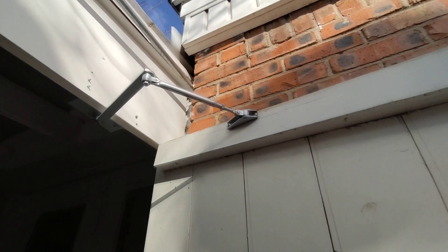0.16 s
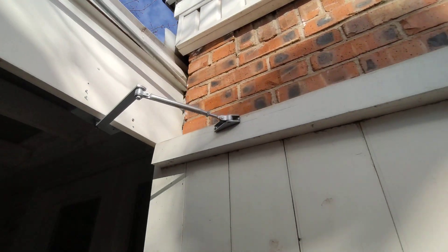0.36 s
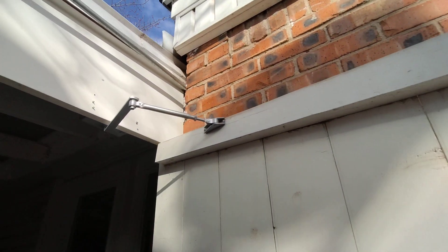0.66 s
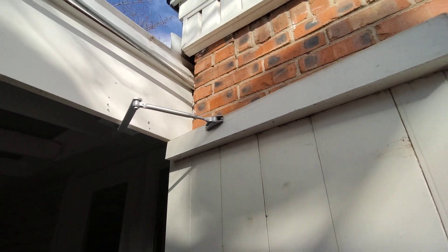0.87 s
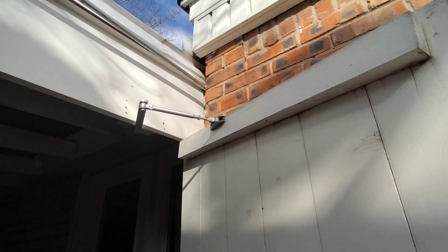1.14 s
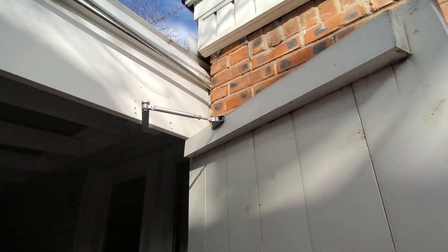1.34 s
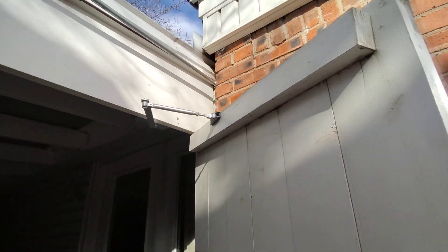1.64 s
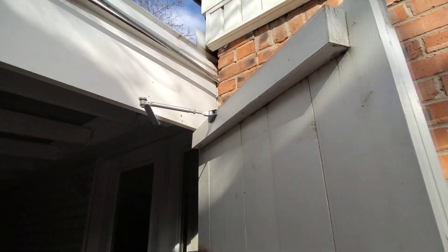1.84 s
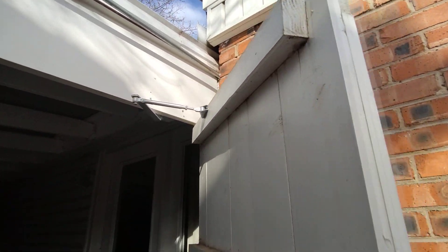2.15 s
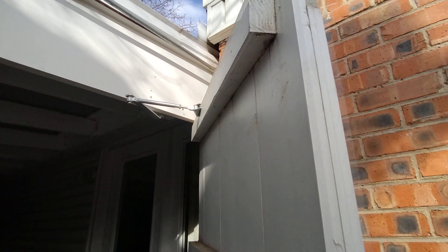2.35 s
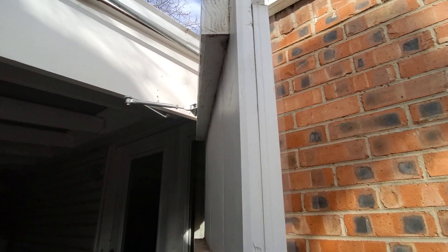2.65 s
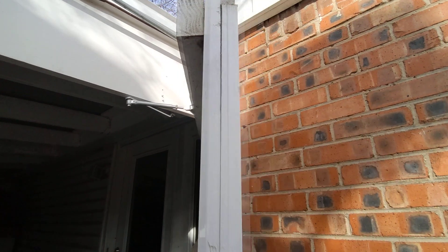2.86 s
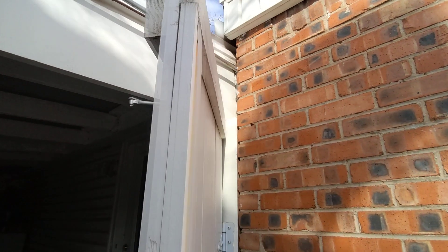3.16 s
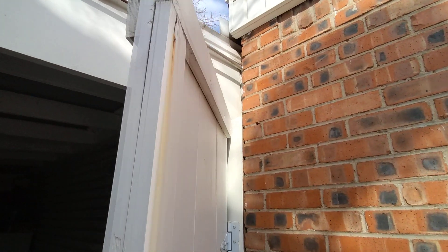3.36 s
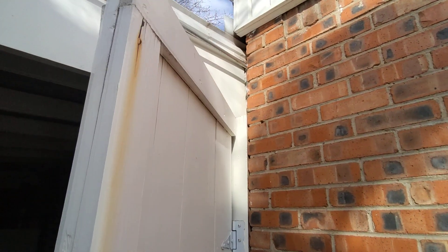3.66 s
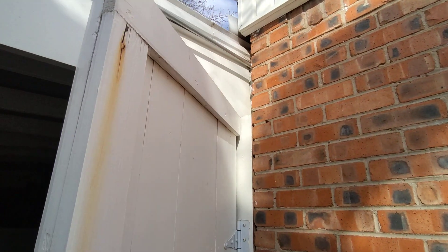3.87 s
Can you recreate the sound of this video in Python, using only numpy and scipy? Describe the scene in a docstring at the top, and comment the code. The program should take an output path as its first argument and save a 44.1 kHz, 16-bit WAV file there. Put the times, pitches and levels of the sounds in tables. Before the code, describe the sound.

A small piston air compressor drones loudly from an open garage, a rough steady low buzz with metallic valve chatter and airy casing noise. A light metal tick sounds near 0.9 s. At 1.9 s it cuts out; a bright air hiss bursts and fades by about 2.5 s as the garage rings briefly. Then wind puffs thump on the handheld microphone, leaves rustle over a faint distant wash, and three scuffs come at 2.85-3.15 s.

```python
"""A small piston air compressor drones inside an open garage, heard from the doorway on a drifting hand-held microphone.
It cuts out as its unloader valve hisses, and the garage rings out; then wind puffs on the microphone, leaves rustle
and three scuffs sound. The drone is shaft-speed sines with reflections, the reed valve and a metal tick are
struck resonances, and hiss, casing, leaves and a distant wash are coloured noise; puffs are short pressure lumps."""
import sys
import numpy as np
from scipy import signal
from scipy.fft import rfft, irfft
from scipy.io import wavfile

SR = 44100
rng = np.random.default_rng(int(sys.argv[2]) if len(sys.argv) > 2 else 0)


def inscribe(sig):
    """Save sig as 16-bit PCM at rate SR to the path in sys.argv[1].

    A 1-D sig is mono; a 2-D sig holds one channel per row.
    Samples are clipped to [-1, 1] before scaling.
    """
    pcm = np.round(np.clip(np.atleast_2d(sig).T, -1, 1) * 32767)
    wavfile.write(sys.argv[1], SR, pcm.astype(np.int16))


N = 176400

TURNS_PER_S = 54.1   # running speed of the shaft
STOP_S, COAST_T60_S = 1.897, 0.7   # power cut, and the fade of the coasting machine


def from_db(db):
    """Decibels to gain."""
    return 10 ** (np.asarray(db, float) / 20)


def rms_one(x):
    """Scale to rms 1."""
    return x / np.sqrt(np.mean(x ** 2) + 1e-20)


def clock():
    """Seconds at every sample."""
    return np.arange(N) / SR


def in_time(rows):
    """Columns of a table as straight lines in time."""
    s, *columns = np.transpose(rows)
    return np.array([np.interp(clock(), s, c) for c in columns])


def at_hz(points, hz):
    """Read a spectrum on a log-frequency axis."""
    point_hz, value = np.array(points).T
    return np.interp(np.log(hz), np.log(point_hz), value)


def port_gains(left_minus_right_db):
    """Split a level difference evenly between the left and right ports."""
    return from_db(np.array([[.5], [-.5]]) * left_minus_right_db)


def drift(rate):
    """Slow random wander of rms 1: noise through two equal low-pass poles at rate Hz."""
    step = 40   # samples between the computed points
    r = np.exp(-2 * np.pi * rate * step / SR)
    white = rng.standard_normal(N // step + 2002)
    slow = signal.lfilter([1], [1, -2 * r, r * r], white)[2000:]
    return np.interp(np.arange(N) / step, np.arange(len(slow)), rms_one(slow))


def dying(start, t60):
    """1 until start, then an exponential fall of 60 dB per t60."""
    return from_db(-60 * np.maximum(clock() - start, 0) / t60)


def ring(clicks, hz, t60):
    """A two-pole resonator: a unit click sets a sine of height 1 ringing."""
    r, w = np.exp(-np.log(1000) / (t60 * SR)), 2 * np.pi * hz / SR
    return signal.lfilter([0, np.sin(w)], [1, -2 * r * np.cos(w), r * r], clicks + 1e-18)


def noise(spectrum, patchy_db, alike_share=1):
    """Stereo noise of a given colour, part shared by the two ports, flickering by octave."""
    # likeness of the two ports before the lag: (f/Hz, likeness 0-1)
    port_likeness = [(60, 0.61), (130, 0.98), (290, 0.98), (640, 0.068), (1410, 0.01), (3100, 0.01),
                     (6820, 0.06), (15000, 0.055)]
    # level difference of the two ports, applied above 500 Hz only: (f/Hz, L-R level/dB)
    port_balance = [(60, -5.0), (130, -5.0), (290, 10), (640, 0.5), (1410, 2.5), (3100, -4.5), (6820, 1),
                    (15000, 1.5)]
    right_lag_s, flicker_hz = .0005, 17.6
    hz = np.maximum(np.arange(N // 2 + 1) * SR / N, 1)
    alike = np.clip(alike_share * at_hz(port_likeness, hz), -1, 1)
    colour = from_db(at_hz(spectrum, hz)) * (hz > spectrum[0][0])
    mid, side = rfft(rng.standard_normal((2, N))) * colour
    both = np.sqrt(1 + alike) * mid + np.sqrt(1 - alike) * side * [[1], [-1]]
    both = both * port_gains(at_hz(port_balance, hz) * (hz > 500))
    both[1] *= np.exp(-2j * np.pi * hz * right_lag_s)
    octave = np.clip(np.log2(hz / 60), 0, 8)
    out = np.zeros((2, N))
    for k in range(9):
        band = irfft(both * np.clip(1 - abs(octave - k), 0, 1), N)   # overlapping triangles
        out += band * from_db(patchy_db * drift(flicker_hz))
    return rms_one(out)


def turns():
    """Turns of the shaft so far; it slows once the power is cut."""
    slowing_hz_per_s = 60
    speed = TURNS_PER_S - slowing_hz_per_s * np.maximum(clock() - STOP_S, 0)
    return np.cumsum(np.maximum(speed, 0)) / SR


def drone(shaft):
    """Multiples of the shaft speed: a direct wave and its reflection, which slides in and out of step."""
    # (multiple, direct level/dB left, right, dip depth 0-1 left, right, dips per s left, right,
    #  t/s of a dip left, right, left leads/rad); the sign of the dip rate is the way the reflection slides
    harmonics = [(1, -44, -44, 0.19, 0.17, -0.19, -0.29, 0.9, 0.83, -0.2),
                 (2, -25, -24, 0.35, 0.43, 0.17, 0.13, 1.25, 1.25, 0.3),
                 (3, -24, -23, 0.11, 0.18, 0.25, 0.27, 2.38, 1.83, 0.43),
                 (4, -41, -42, 0.34, 0.61, 0.36, 0.3, 3.3, 0.76, -0.56),
                 (5, -41, -41, 0.11, 0.63, 0.29, 0.17, 0.69, 1.45, 0.35),
                 (6, -27, -26, 0.51, 0.36, -0.07, -0.06, 2.19, 1.63, 0.9),
                 (7, -38, -32, 0.74, 0.29, 0.28, -0.37, 3.04, 1.38, 0.07),
                 (8, -39, -53, 0.72, 0.71, -0.28, 0.57, 1.76, 0.96, 1.63),
                 (9, -30, -32, 0.22, 0.41, -0.61, -0.61, -0.15, 0.66, -1.49),
                 (10, -29, -35, 0.27, 1.0, 0.42, 0.44, 0.67, 0.38, 1.14),
                 (11, -28, -30, 0.71, 1.0, 0.41, 0.18, 0.84, 1.39, -0.27),
                 (12, -30, -38, 0.91, 1.0, 0.13, -0.34, 0.27, 0.64, 0.59),
                 (13, -35, -39, 0.91, 0.52, -0.25, -0.35, -0.18, 0.79, 0.72),
                 (14, -25, -30, 0.59, 0.74, 0.81, 0.7, 0.7, 1.34, 1.03),
                 (15, -31, -28, 0.53, 0.53, 0.61, 0.59, -1.32, 1.57, 0.81),
                 (16, -36, -30, 0.4, 0.8, -0.82, -0.12, 0.65, 1.56, 0.43),
                 (17, -29, -40, 0.66, 0.65, -0.13, -0.93, 0.65, 1.06, -0.45),
                 (18, -26, -26, 0.73, 0.28, 0.45, 0.94, 0.39, -0.05, 3.2),
                 (19, -32, -35, 0.39, 1.0, 0.79, -0.47, 1.62, 0.17, -2.98),
                 (20, -32, -33, 0.32, 1.0, 0.94, -0.12, 1.98, -0.17, -3.2),
                 (21, -43, -41, 1.0, 0.88, -0.52, -0.61, 2.71, 1.51, -0.78),
                 (22, -40, -38, 1.0, 0.84, 0.92, 0.43, 1.39, 2.79, 0.45),
                 (23, -43, -41, 0.78, 1.0, -1.17, 0.27, 1.9, 0.02, -2.58),
                 (24, -37, -37, 0.58, 0.43, -0.41, -0.52, 1.48, 2.78, -2.92),
                 (25, -38, -45, 0.39, 0.59, 0.49, -1.25, 0.72, 1.06, -1.68),
                 (26, -38, -39, 0.65, 0.38, -0.44, -1.18, 0.38, 0.97, 0.36),
                 (27, -43, -45, 1.0, 0.57, 0.39, -0.55, -1.2, 2.39, 1.07),
                 (28, -41, -44, 0.31, 0.43, 1.25, 0.75, 1.62, 1.55, -1.33),
                 (29, -41, -37, 0.83, 0.45, 1.41, -0.22, -1.1, 1.32, 2.98),
                 (30, -47, -48, 0.59, 0.47, 0.6, -0.95, 2.37, -0.71, -1.12),
                 (31, -38, -43, 0.82, 1.0, -0.57, 0.16, 2.1, 2.31, 0.01),
                 (32, -37, -50, 0.82, 1.0, 0.68, -0.66, 2.79, -0.18, 0.85),
                 (33, -40, -41, 0.57, 0.33, -0.46, 1.43, 1.45, 0.02, -1.91),
                 (34, -36, -33, 0.74, 0.76, 0.33, -0.21, 0.81, 1.35, -0.82),
                 (35, -40, -41, 0.73, 0.51, -0.67, 0.56, -0.96, 1.16, -2.0),
                 (36, -41, -49, 0.4, 0.9, -0.95, -0.73, 1.49, -0.74, -1.49),
                 (37, -37, -49, 0.89, 0.76, 0.1, 0.88, -0.09, 2.83, -3.2),
                 (38, -44, -46, 0.49, 0.34, -1.38, -0.81, 2.78, 1.56, 1.67),
                 (39, -48, -49, 0.53, 0.75, 1.69, 1.1, 0.06, 2.15, -1.14),
                 (40, -50, -45, 1.0, 0.49, 0.73, 0.46, -0.36, 0.48, -0.72)]
    # one multiple stands out at first: (t/s, gain level/dB)
    whine_gain = [(0, 5), (.17, 4), (.42, -3), (.8, 0), (4, 0)]
    whine_multiple = 34
    stroke_spread = .35   # how far higher multiples trail within a turn, rad per multiple squared
    waver_db, waver_hz = .3, 5.6
    thump_top, thump_ends_s, thump_loss_db, thump_fall_s = 5, 1.912, -9, .012
    held_share, held_for_s, held_t60_s = .72, .03, .3   # part of the drone stored in the garage

    used = slice(0, int((STOP_S + .4) * SR))
    out, s = np.zeros((2, N)), clock()[used]
    # the lowest multiples drop when the unloader opens
    unloaded = thump_loss_db * np.clip((s - thump_ends_s) / thump_fall_s, 0, 1)
    coasting = (1 - held_share) * dying(STOP_S, COAST_T60_S)[used]
    held = held_share * dying(STOP_S + held_for_s, held_t60_s)[used]
    whine = in_time(whine_gain)[0, used]
    lost = TURNS_PER_S * s - shaft[used]   # turns lost to slowing
    for k, *pairs, lead in harmonics:
        db, depth, dips, dip_s = np.reshape(pairs, (4, 2, 1))
        phase = 2 * np.pi * k * TURNS_PER_S * s - stroke_spread * k * k + np.array([[lead], [0]])
        reflection = depth * np.exp(2j * np.pi * dips * (s - dip_s))
        wave = np.exp(1j * phase) * (1 - reflection)
        # the stored part dies away at full pitch, the coasting part falls with the shaft
        wave = np.real(wave * (held + coasting * np.exp(-2j * np.pi * k * lost)))
        level = db + waver_db * drift(waver_hz)[used]
        level = level + unloaded * (k <= thump_top) + whine * (k == whine_multiple)
        out[:, used] += np.sqrt(2) * from_db(level) * wave
    return out


def valve(shaft):
    """The reed slaps twice a turn and strikes resonances; each ring swells and fades on its own."""
    # rings of the reed: (f/Hz, level/dB per slap before the waver, t60/s)
    reed_rings = [(2520, -48, .03), (4545, -51, .16), (6170, -54, .1), (6277, -51, .14), (6332, -46, .2),
                  (6385, -50, .14), (6600, -54, .1), (7900, -56, .05)]
    return_slap = .6   # strength of the second slap of a turn
    waver_db, waver_hz = 2, 1.4
    thin_whine_hz, swell_s, swell_width_s, swell_db = 4545, 1.68, .1, 6   # one ring swells late
    slap_steps = np.floor(shaft) + return_slap * np.floor(shaft + .5)
    uneven = from_db(rng.normal(0, 1, N))
    slaps = np.diff(slap_steps, prepend=0) * uneven * dying(STOP_S, COAST_T60_S)
    swell = swell_db * np.exp(-((clock() - swell_s) / swell_width_s) ** 2)
    rung = np.zeros(N)
    for hz, db, t60 in reed_rings:
        level = db + waver_db * drift(waver_hz) + swell * (hz == thin_whine_hz)
        rung += from_db(level) * ring(slaps, hz, t60)
    return np.array([rung, np.roll(rung, 20)])   # right port 20 samples later


def casing(shaft):
    """Air and casing noise that pulses with each stroke, twice a turn."""
    # colour of the airflow and casing noise: (f/Hz, relative level/dB per Hz)
    casing_colour = [(25, -50), (60, -34), (130, -17), (225, -23), (330, -10), (480, -4.5), (700, -7.5),
                     (950, -6.5), (1300, -10), (1870, -6), (2800, -12), (4000, -14.5), (5100, -16.5),
                     (6400, -14), (8500, -18), (10500, -27), (13300, -37.5), (15500, -46)]
    level_db, pulsing, t60_s = -24.5, 0.027, 0.85
    pulse = 1 + pulsing * np.cos(2 * 2 * np.pi * shaft) * dying(STOP_S, COAST_T60_S)
    return from_db(level_db) * pulse * dying(STOP_S, t60_s) * noise(casing_colour, patchy_db=.5)


def ring_out():
    """The smeared drone dies away in the garage as noise; a few resonant pitches stand out of it."""
    # colour of the garage ringing out: (f/Hz, relative level/dB per Hz)
    garage_colour = [(35, -54), (60, -16), (190, -1), (237, -19), (339, 2), (414, -7), (629, -1), (815, -5),
                     (1100, -5.5), (1370, -10), (1600, -8), (2860, -14.5), (7000, -16), (9100, -46),
                     (15400, -120)]
    # pitches that linger: (f/Hz, level/dB against the smear, t60/s)
    lingering = [(148, -18, 0.14), (288.4, -15, 0.54), (496, -22, 0.22), (636, -12, 0.34), (769, -10, .35),
                 (1107, -9.5, .25)]
    level_db, rise_s, t60_s = -16.5, 0.056, 0.64
    rise = np.clip((clock() - STOP_S) / rise_s, 0, 1)
    smear = noise(garage_colour, patchy_db=-1.0)
    pitches = sum(from_db(db) * rms_one(ring(smear, hz, t60)) for hz, db, t60 in lingering)
    return from_db(level_db) * rise * dying(STOP_S, t60_s) * (smear + pitches)


def unloader():
    """The unloader valve vents a jet of air: bright noise that bursts out and fades."""
    # (t/s, level/dB)
    venting = [(1.86, -42), (1.89, -23.5), (1.97, -22.5), (2.07, -22), (2.14, -25.5), (2.2, -30),
               (2.35, -35), (2.6, -44), (2.75, -58)]
    # colour of the jet: (f/Hz, relative level/dB per Hz)
    jet_colour = [(1470, -54), (2500, -15), (4470, -8.5), (6110, -3), (6740, -3), (7920, 1), (10600, -3),
                  (11300, -8), (15500, 0.5)]
    return from_db(in_time(venting)) * noise(jet_colour, patchy_db=1.0)


def tick():
    """One light tap on metal: a dry snap of noise and a short ring of struck modes."""
    # modes of the metal: (f/Hz, level/dB against the tap, t60/s)
    metal_modes = [(3100, -1, .03), (3900, -4, .025), (4500, -1, .03), (5100, -5, .02), (5720, -1, .075),
                   (7700, -9, .02), (11300, -13, .015)]
    tick_s, tick_db = .919, -25
    snap_db, snap_t60_s = -6, .03   # snap level is against the tap
    click = np.zeros(N)
    click[int(tick_s * SR)] = from_db(tick_db)
    band = signal.butter(2, [2500, 6500], "band", fs=SR, output="sos")
    bright = rms_one(signal.sosfilt(band, rng.standard_normal(N)))
    snap = from_db(tick_db + snap_db) * (clock() > tick_s) * dying(tick_s, snap_t60_s) * bright
    return snap + sum(from_db(db) * ring(click, hz, t60) for hz, db, t60 in metal_modes)


def scuffs():
    """Short gritty slides on the ground that sag as they go: noise, a rough gliding squeak and a bright spray."""
    # (t/s, grit level/dB before the sag, length/s, squeak f/Hz, its rise/Hz per s,
    #  squeak level/dB against the grit, spray level/dB against the grit, L-R level/dB)
    slides = [(2.848, -33.5, 0.09, 2300, -900, -5.5, -4.5, -0.5),
              (3.028, -40, 0.084, 1690, 2600, 1.5, -12, 2), (3.124, -47, 0.07, 790, 100, -3, -12, 5)]
    # colour of the grit: (f/Hz, relative level/dB per Hz)
    grit_colour = [(180, -37), (300, -0.5), (598, -2), (672, -8), (1060, 1.5), (1360, -3.5), (2270, -0.5),
                   (2520, -9), (6530, -10), (7680, -11), (10000, -31), (13000, -53), (22000, -120)]
    attack_s, sag_db_per_s, t60_s = 0.012, 70, .2
    squeak_rough_hz, spray_hz, spray_t60_s = 130, 3640, 0.82
    grit, out = noise(grit_colour, patchy_db=1.5, alike_share=0.81), np.zeros((2, N))
    spray = rms_one(ring(grit, spray_hz, 0.0027))   # so short a ring leaves a broad band
    for s, db, length, hz, rise, squeak_db, spray_db, pan_db in slides:
        into = np.clip(clock() - s, 0, length)
        attack = np.clip((clock() - s) / attack_s, 0, 1)
        shape = attack * from_db(-sag_db_per_s * into) * dying(s + length, t60_s)
        phase = 2 * np.pi * np.cumsum(hz + rise * into) / SR
        squeak = np.array([drift(squeak_rough_hz) * np.cos(phase) + drift(squeak_rough_hz) * np.sin(phase)
                           for port in "LR"])
        parts = grit + from_db(squeak_db) * squeak + from_db(spray_db) * spray * dying(s, spray_t60_s)
        out += from_db(db) * port_gains(pan_db) * shape * parts
    return out


def wind():
    """Wind on the microphone: lumpy low noise with a level for each port, and short pressure puffs."""
    # rumble between the puffs: (t/s, left level/dB, right level/dB)
    breeze = [(0, -41, -37), (1.9, -33, -42.5), (2.2, -39.5, -30), (2.4, -43.5, -38), (2.6, -42, -43.5),
              (2.8, -37, -29), (2.92, -44, -31.5), (3.1, -43, -36), (3.22, -41.5, -41.5), (3.4, -42, -29.5),
              (3.55, -41, -41), (3.7, -40.5, -40.5), (4, -43, -43.5)]
    # colour of the rumble: (f/Hz, relative level/dB per Hz)
    rumble_colour = [(12, -54), (20, -26), (86, 5.5), (161, -5), (185, -2), (235, -7), (357, -21),
                     (500, -21), (650, -30), (1100, -120)]
    # puffs on the ports: (t/s half a cycle ahead of the middle, level/dB of the lump's height averaged
    #  over both ports, f/Hz, L-R level/dB)
    puffs = [(2.174, -29, 84, -16.5), (2.192, -19.5, 120, -21), (2.233, -25.5, 99, -31),
             (2.259, -16, 85, -37), (2.289, -26, 116, -23), (2.332, -27, 75.4, -19), (2.378, -28, 97, -21),
             (2.448, -30.5, 71, -9), (2.658, -37, 99, 15), (2.741, -21, 125, 11), (2.785, -16, 101, -15),
             (2.847, -14, 125, -30), (2.86, -16.5, 136, -29), (2.97, -23, 78.1, -20), (3, -16.5, 93.5, -26),
             (3.037, -25, 110, -18), (3.085, -27.5, 98, -25), (3.113, -32, 59.7, -6), (3.148, -31, 101, 10),
             (3.273, -26.5, 72, -24), (3.348, -22, 139, -33), (3.357, -28, 61, -21),
             (3.403, -20.5, 96, -15), (3.427, -21.5, 109, -15), (3.529, -30, 106, -2.5),
             (3.599, -32, 154, -3.0), (3.789, -40, 74.6, -0.5), (3.859, -37, 83.4, -1.5),
             (3.939, -32, 103, -2.5)]
    puff_cycles = 1.2   # width of a puff between its 1/e points
    out = from_db(in_time(breeze)) * noise(rumble_colour, patchy_db=3.5, alike_share=1.0)
    phases = rng.uniform(-0.41, 1, len(puffs))
    for (s, db, hz, pan_db), phase in zip(puffs, phases):
        span = slice(int((s - .05) * SR), int((s + .07) * SR))
        cycles = (clock()[span] - s) * hz - .5
        lump = np.exp(-(2 * cycles / puff_cycles) ** 2) * np.cos(2 * np.pi * cycles + phase)
        sides = port_gains(pan_db)
        out[:, span] += from_db(db) * sides / sides.mean() * lump
    return out


def leaves():
    """Leaves rustle outdoors: bright flickering noise that comes and goes."""
    # (t/s, level/dB)
    rustle = [(0, -53.5), (2.2, -37.5), (2.33, -40.5), (2.5, -33.5), (2.63, -35.5), (2.68, -39.5),
              (2.75, -40), (2.85, -35), (3.0, -38), (3.15, -42.5), (3.22, -43.5), (3.43, -45.5),
              (3.47, -38.5), (3.61, -39), (3.68, -44), (3.75, -43.5), (3.9, -38.5), (4.0, -41)]
    # colour of the leaves: (f/Hz, relative level/dB per Hz)
    leaf_colour = [(880, -33), (1500, -5), (2200, -2.5), (3120, -5.5), (7980, -3), (10300, -7.5),
                   (11200, -14), (14800, -13), (15500, -5)]
    return from_db(in_time(rustle)) * noise(leaf_colour, patchy_db=2.0, alike_share=1.0)


def distant_wash():
    """A distant dull wash, perhaps traffic: steady-coloured noise with the treble missing."""
    # (t/s, level/dB)
    wash = [(0, -45), (2.2, -50), (2.32, -51), (2.5, -45), (2.65, -46.5), (2.8, -47.5), (3.0, -43.5),
            (3.2, -47.5), (3.35, -47.5), (3.5, -48), (3.7, -46), (3.9, -45), (4, -45)]
    # colour of the wash: (f/Hz, relative level/dB per Hz)
    wash_colour = [(150, -38), (250, -0.5), (360, 1.5), (403, -3.5), (523, -6), (737, 0.5), (809, -3),
                   (1010, 0.5), (3000, -16), (3900, -43), (6600, -120)]
    return from_db(in_time(wash)) * noise(wash_colour, patchy_db=0.0, alike_share=0.77)


def scene():
    """Compressor in the garage, its unloader, and the yard around the microphone."""
    shaft = turns()
    compressor = drone(shaft) + valve(shaft) + casing(shaft)
    garage = ring_out() + unloader() + tick()
    yard = scuffs() + wind() + leaves() + distant_wash()
    return compressor + garage + yard


def record(dry):
    """The microphone's chain cuts the deepest bass and the top."""
    low_cut_hz, cutoff_hz = 43, 15750
    thin = signal.sosfilt(signal.butter(2, low_cut_hz, "high", fs=SR, output="sos"), dry)
    return signal.sosfilt(signal.cheby2(16, 60, cutoff_hz, fs=SR, output="sos"), thin)


dry = scene()
out = record(dry)
inscribe(out)
```